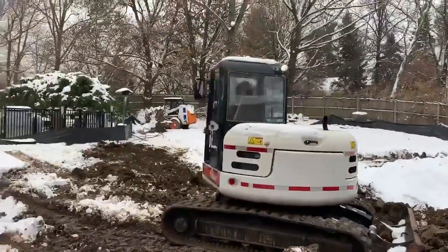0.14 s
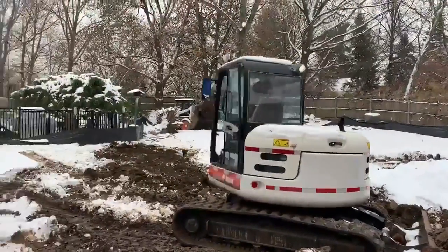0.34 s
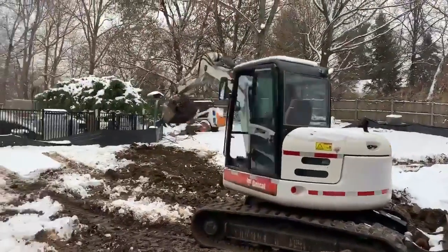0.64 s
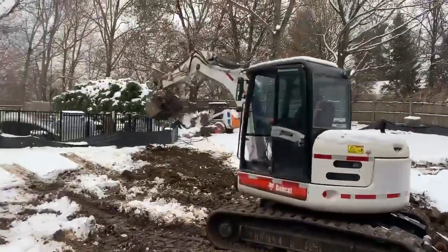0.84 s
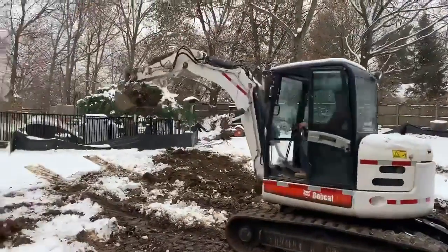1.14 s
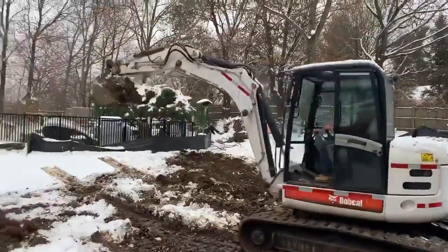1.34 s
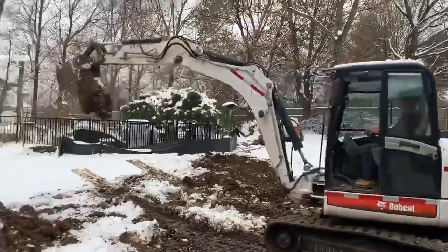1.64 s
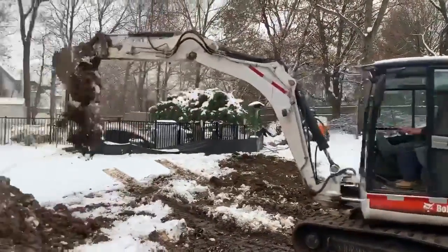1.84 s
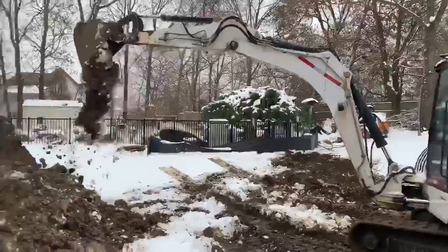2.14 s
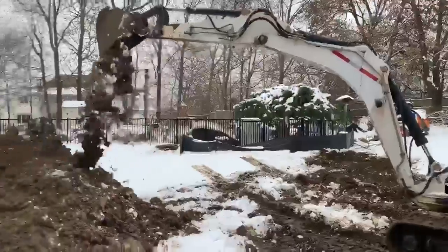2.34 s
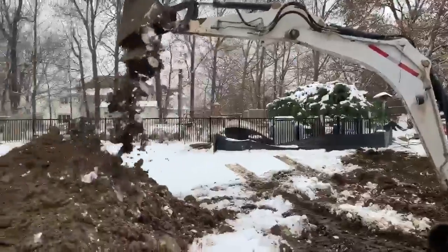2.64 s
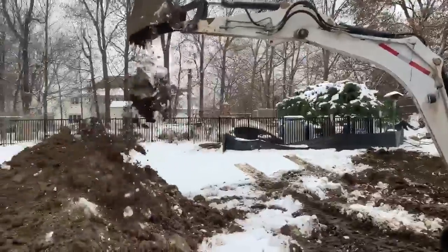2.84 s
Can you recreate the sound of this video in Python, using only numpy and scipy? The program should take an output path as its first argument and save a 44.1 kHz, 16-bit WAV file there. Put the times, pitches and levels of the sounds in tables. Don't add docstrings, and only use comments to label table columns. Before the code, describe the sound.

Steady diesel drone of a compact digger swinging round, then earth dropping from its bucket in gritty bursts

```python
import sys
import numpy as np
from scipy import signal
from scipy.fft import rfft, irfft
from scipy.io import wavfile
from scipy.ndimage import uniform_filter1d

SR = 44100
rng = np.random.default_rng(int(sys.argv[2]) if len(sys.argv) > 2 else 0)


def invert_db(level):
    return 10 ** (np.asarray(level, dtype=float) / 20)


def bounce(signal):
    frames = np.transpose(np.atleast_2d(signal))
    limited = np.clip(frames, -1, 1)
    pcm = np.round(limited * 32767).astype(np.int16)
    wavfile.write(sys.argv[1], SR, pcm)


N = 131418
T = np.arange(N) / SR


def level(x, db):
    return x * invert_db(db) / np.sqrt(np.mean(x ** 2))


def curve(table, column):
    rows = np.array(table, float)
    return np.interp(T, rows[:, 0], rows[:, column])


def shape(table, hz):
    rows = np.array(table, float)
    return np.interp(np.log(np.maximum(hz, 1)), np.log(rows[:, 0]), rows[:, 1])


def colour(x, table):
    hz = np.fft.rfftfreq(len(x), 1 / SR)
    low_skirt = 1 + (table[0][0] / (hz + 1)) ** 4
    high_skirt = 1 + (hz / table[-1][0] / 1.08) ** 4
    return irfft(rfft(x) * invert_db(shape(table, hz)) / low_skirt / high_skirt, len(x))


def noise():
    return rng.standard_normal(N)


def walk(rate):
    hold = int(SR / rate)
    steps = np.repeat(rng.standard_normal(N // hold + 1), hold)
    return 0.89 * uniform_filter1d(uniform_filter1d(steps, hold), hold)[:N]


def patchy(x, lo_hz, hi_hz, flicker_db, rate):
    spec, hz = rfft(x), np.fft.rfftfreq(N, 1 / SR)
    band = np.clip(np.searchsorted(np.geomspace(lo_hz, hi_hz, 17), hz), 1, 16)
    return sum(irfft(spec * (band == k), N) * invert_db(flicker_db * walk(rate)) for k in range(1, 17))


def tone(cycles, db):
    return np.sqrt(2) * invert_db(db) * np.sin(2 * np.pi * cycles)


def around(s):
    near = slice(max(int((s - .08) * SR), 0), int((s + .2) * SR))
    return near, T[near] - s


def burst(t, rise_ms, fall_ms):
    return np.exp(-1000 * np.abs(t) / np.where(t < 0, rise_ms, fall_ms))


# start_s, firing_hz, level_db
EXHAUST = [(0, 65.67, -21.5), (.19, 65.67, -25), (.4, 66.38, -29.5), (.62, 65.02, -22.5),
           (.85, 64.97, -21.5), (1.15, 65.11, -20), (1.42, 66.3, -21.5), (1.6, 63.23, -19),
           (1.75, 62.09, -19), (1.95, 62.82, -18), (2.12, 63.76, -17), (2.27, 61.33, -18),
           (2.45, 62.58, -17.5), (2.7, 62.6, -19), (2.98, 61.9, -18.5)]


def exhaust():
    turns = np.cumsum(curve(EXHAUST, 1)) / SR
    return turns, tone(turns, curve(EXHAUST, 2) + .5 * walk(26.4))


# start_s, bay_facing_db, body_load_db, pump_load_db, fan_db
SWING = [(0, 0.5, 1, -13, -0.5), (.15, 0.5, -4.5, -10, 4.5), (.3, -1, -2.5, -12, -3.5),
         (.5, -1.5, -0.5, -10, -7), (.65, -2.5, -0.5, -7.5, -2.5), (.78, -3.5, 0, -9, 1.5),
         (1.02, -5.5, 0, -12, -1), (1.12, -5.5, 1, -1, -3.5), (1.35, -6.5, -0.5, 0, 5),
         (1.47, -8, 0, -5, 6), (1.57, -8.5, 0.5, -16, -1), (2.05, -10.5, 1.5, -10.5, -2.5),
         (2.2, -10.5, 2, 3, 1), (2.4, -11, 2, -5.5, 2), (2.98, -11.5, 2.5, -9.5, 0)]


def swing():
    return [curve(SWING, column) for column in (1, 2, 3, 4)]


# multiple_of_firing, facing_db, turned_away_db, unsteadiness_db
ORDERS = [(2, -42.5, -34, -2.5), (2.5, -33, -60, -1.5), (3, -30, -37.5, 2), (3.5, -29, -42.5, -2),
          (4, -76, -44, -8), (4.5, -50, -28.5, 4.5), (6, -32.5, -47, 2), (13, -46, -48.5, 2),
          (14, -43, -54, -1), (15, -45, -66, 1), (26, -55, -83, 7), (20.5, -45, -60, -5),
          (40.9, -52, -67, 1), (44.4, -51, -87, 3), (49.2, -56, -63, -2), (66, -64, -80, 3),
          (85, -57, -90, -8)]


def engine_orders(turns, facing, load):
    change = 1 / (1 + np.exp(-(T - 1.5) / 0.031))
    change_share = 0.57
    turned = np.maximum(facing / facing.min(), 0)
    away = np.clip((1 - change_share) * turned + change_share * change, 0, 1)
    out = np.zeros(N)
    for multiple, near_db, away_db, loose_db in ORDERS:
        cycles = np.round(2 * multiple) / 2 * turns + rng.random() + 0.038 * walk(9)
        flutter_db = np.clip(loose_db, 0, 3.5) * walk(13.75)
        out += tone(cycles, near_db + away * (away_db - near_db) + load + flutter_db)
    return out


def pump_and_fan(turns, pump_db, fan_db):
    pump = tone(9 * turns + 0.018 * walk(3.3), -34 + pump_db + 0.84 * walk(12))
    fan = tone(4.8 * turns + 0.058 * walk(19), -33 + fan_db + 1.5 * walk(13))
    overtone = tone(13.5 * turns + 0.046 * walk(37), -41 + 1.9 * walk(25.6))
    tip_s, tip_span_s = 1.45, 0.17
    return pump + fan + overtone * np.exp(-((T - tip_s) / tip_span_s) ** 2)


# pitch_hz, level_db (per Hz)
BAY = [(700, 7.5), (1000, -2.5), (1900, -7), (2900, -4.5), (3800, -9), (5100, -15.5), (10000, -16),
       (16000, -21.5)]
# pitch_hz, width_hz, level_db
COVERS = [(2680, 130, -47), (2890, 200, -44), (3120, 220, -47), (4380, 300, -53)]


def bay_clatter(turns, facing):
    beat = np.cos(2 * np.pi * turns)
    clatter = noise() * invert_db(1.5 * beat + 1.16 * walk(40.06) + 0.23 * walk(7.9))
    out = level(patchy(colour(clatter, BAY), 700, 21700, flicker_db=0.43, rate=14.7), 0) * invert_db(-30.5 + facing)
    for hz, width_hz, db in COVERS:
        edges_hz = [hz - width_hz / 2, hz + width_hz / 2]
        ring = signal.sosfilt(signal.butter(2, edges_hz, "band", fs=SR, output="sos"), clatter)
        out += level(ring, db) * invert_db(2.4 * facing)
    return out


# pitch_hz, level_db (per Hz)
BODY = [(45, -5), (95, -10), (200, -2), (300, -4), (420, -6.5), (620, -17), (880, -12.5), (1500, -24)]


def body_rumble(load):
    rumble = noise() * invert_db(1.8 * walk(29.9))
    return level(colour(rumble, BODY), -27.5) * invert_db(load)


def engine():
    turns, hum = exhaust()
    facing, load, pump_db, fan_db = swing()
    whine = engine_orders(turns, facing, load) + pump_and_fan(turns, pump_db, fan_db)
    return hum + whine + bay_clatter(turns, facing) + body_rumble(load)


# start_s, level_db, pitch_hz, brightness_db, length_ms
THUDS = [(.125, -17.5, 210, -22, 7.5), (0.325, -19, 227, -14, 4.9), (0.534, -19.5, 242, -18, 8.6),
         (0.8, -36, 234, -5, 11), (1.4, -20, 312, -18, 6.4), (1.415, -22, 320, -8, 17),
         (1.466, -19, 305, -14, 4.9), (1.601, -20.5, 283, -30, 28), (1.64, -26.5, 292, -7, 9),
         (1.7313, -4, 237, -19, 5.7), (1.829, -23, 254.4, -5.5, 9.3), (1.857, -26.5, 263, 1, 5.3),
         (2.11, -19.5, 300, -17, 20), (2.232, -19, 275, -23, 12), (2.47, -19.5, 274, -28, 24),
         (2.625, -17.5, 430, -2.5, 7.3), (2.634, -6.5, 221, -23.5, 16.7), (2.77, -16, 289, -11.5, 13.6),
         (2.871, -21.5, 292, -6, 6.3), (2.922, -18, 280, -9, 3.5)]


def thuds():
    out = np.zeros(N)
    crumble = level(colour(noise(), [(500, 0), (700, 1.5), (1000, 0.5), (1550, -1), (1800, -10)]), 0)
    dull = level(colour(noise(), [(150, -2), (300, -10.0), (430, 4), (600, -53)]), 0)
    for s, db, hz, bright_db, ms in THUDS:
        near, t = around(s)
        swell = np.exp(-(t / ms * np.where(t < 0, 1400, 800)) ** 2)
        ring = np.cos(2 * np.pi * hz * t) + 0.3 * dull[near]
        out[near] += invert_db(db) * swell * (ring + invert_db(bright_db) * crumble[near])
    return out


# start_s, level_db, pitch_hz, t60_s
PINS = [(1.376, -27, 4740, 0.04), (1.377, -28.5, 5200, 0.036), (1.378, -29, 4500, .04),
        (1.386, -22, 614, .025), (1.407, -17.5, 1080, 0.043), (1.419, -22, 880, 0.042),
        (1.638, -30, 790, 0.069), (2.64, -19, 232.6, 0.55), (2.407, -24, 3450, 0.023),
        (2.577, -19, 5400, .02), (2.577, -24, 2940, .025), (2.684, -28, 5470, 0.013),
        (2.768, -21, 3000, 0.018), (2.77, -28, 7000, .015), (2.866, -25, 5340, .02)]


def pins():
    out = np.zeros(N)
    for s, db, hz, t60 in PINS:
        near, t = around(s)
        t = np.maximum(t, 0)
        modes = np.sin(2 * np.pi * hz * t) + 0.8 * np.sin(2 * np.pi * 0.9 * hz * t)
        out[near] += invert_db(db - 60 * t / t60) * modes
    return out


# (added above 5500 Hz, taken off
SPRAYS = [(1.379, -40.5, 3, 5.7, 2), (1.738, -42, 6, 20, -13), (1.855, -45, 6.7, 7.1, -14),
          (2.073, -41.5, 3.4, 31, 7), (2.15, -53, 10, 23, -12), (2.32, -55, 3.5, 9.3, 9),
          (2.352, -34, 1.5, 4, 6), (2.384, -41, 3, 20, 5), (2.409, -28.5, 4, 6.9, -2),
          (2.44, -49, 5, 13, 8), (2.492, -37.5, 12, 13, 4), (2.52, -42.5, 14, 28, 1),
          (2.578, -26.5, 5.7, 8.7, 2.5), (2.628, -34.5, 8.4, 22, -5), (2.683, -29.5, 7.2, 12, 2),
          (2.772, -27.5, 14, 16, -2), (2.81, -38, 22, 43, 4), (2.847, -41.5, 4.6, 5, 11),
          (2.868, -31, 19, 32, 3), (2.921, -32, 26, 23, 1.5)]


def sprays(sand):
    low = signal.sosfiltfilt(signal.butter(2, 5500, fs=SR, output="sos"), sand)
    high = sand - low
    out = np.zeros(N)
    for s, db, rise_ms, fall_ms, tilt_db in SPRAYS:
        near, t = around(s)
        swell = burst(t, rise_ms, fall_ms) + .6 * burst(t, 2, 2)
        out[near] += invert_db(db) * swell * (low[near] * invert_db(-tilt_db) + high[near] * invert_db(tilt_db))
    return out


# start_s, level_db, rise_ms, fall_ms
PEBBLES = [
    (2.211, -42, 1, 3),
    (2.571, -31, 1, 4),
    (2.676, -37, 1.5, 4),
    (2.692, -31, 1, 1.8),
    (2.767, -34, 1, 3),
    (2.777, -29, 1, 2.5),
    (2.864, -30, 1, 2.5),
    (2.871, -26, 1.1, 2.7),
    (2.889, -38, 1, 3.9),
    (2.93, -36, 1, 2.7),
]


def pebbles(sand):
    out = np.zeros(N)
    for s, db, rise_ms, fall_ms in PEBBLES:
        near, t = around(s)
        out[near] += invert_db(db) * burst(t, rise_ms, fall_ms) * sand[near]
    return out


# pitch_hz, level_db (per Hz)
GRIT = [(1200, -4), (2800, 3), (4000, 3.5), (5500, 0), (7500, -2), (10500, 2.5), (13000, -2), (16000, 2.5)]


def grit():
    grains_per_s, spread_db = 2200, 8
    size = np.minimum(rng.exponential(size=N), 2.3)
    grains = noise() * (rng.random(N) < grains_per_s / SR) * invert_db(spread_db * size)
    sand = level(colour(level(grains, 0) + 1.4 * noise(), GRIT), 0)
    trickle_s, onset_s = 2.06, 0.098
    started = 1 / (1 + np.exp(-np.clip((T - trickle_s) / onset_s, -50, 50)))
    trickle = sand * invert_db(-42 + 3.8 * walk(24.95)) * started
    return (trickle + sprays(sand) + pebbles(sand)) * invert_db(1.3 * walk(250))


# pitch_hz, level_db (per Hz)
AIR = [(1500, 3), (3500, 7), (7000, 2.5), (16000, -23)]


def cooling_air():
    return level(colour(noise(), AIR), -54.5)


# pitch_hz, level_db (re direct)
YARD = [(70, -21), (130, -10), (330, -11), (560, -4), (1300, 2), (6500, 0), (8000, -16), (16000, -18)]


def yard_echo(machine, soil, hz):
    yard_db = shape(YARD, hz)
    heap_db = np.where(hz > YARD[5][0], np.maximum(yard_db, -5), yard_db) - 5
    far = machine * invert_db(yard_db) + soil * invert_db(heap_db)

    def echo():
        tails = rng.standard_normal((2, N)) * invert_db(-60 * np.minimum(T / .09, 3))
        one, two = irfft(far * rfft(level(tails, 0) / np.sqrt(N)), N)
        drift = 2.5 * walk(7)
        return one * np.cos(drift) + two * np.sin(drift)
    return echo


# pitch_hz, left_lead_rad
PORTS = [(0, 0), (950, -1.0), (2400, -1.8), (4200, -3.14), (6500, -6.28), (8680, -9.42), (13500, -15.71),
         (15700, -18.85)]


def scene():
    machine, soil = rfft(engine() + cooling_air()), rfft(thuds() + pins() + grit())
    hz = np.fft.rfftfreq(N, 1 / SR)
    lead = np.interp(hz, *np.array(PORTS).T) / 2
    echo = yard_echo(machine, soil, hz)
    left_db = -1.8 + .42 * T
    out = []
    for side in (1, -1):
        direct = irfft((machine + soil) * np.exp(1j * side * lead), N)
        out.append((direct + echo()) * invert_db(side * left_db / 2))
    return np.array(out)


def top_cut(x):
    return signal.sosfilt(signal.butter(12, 15900, fs=SR, output="sos"), x)


def record(dry):
    rounded = np.tanh(.45 * dry) / .45
    top_hz = 15730
    mix = signal.sosfilt(signal.ellip(8, .2, 60, top_hz, fs=SR, output="sos"), rounded)
    return top_cut(mix)


dry = scene()
out = record(dry)
bounce(out)
```